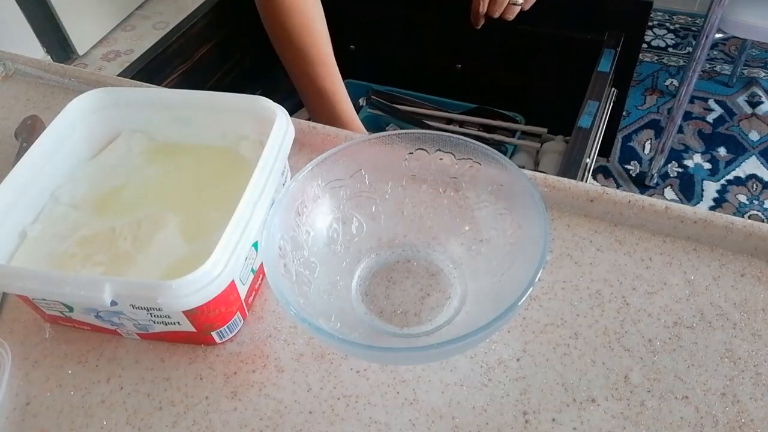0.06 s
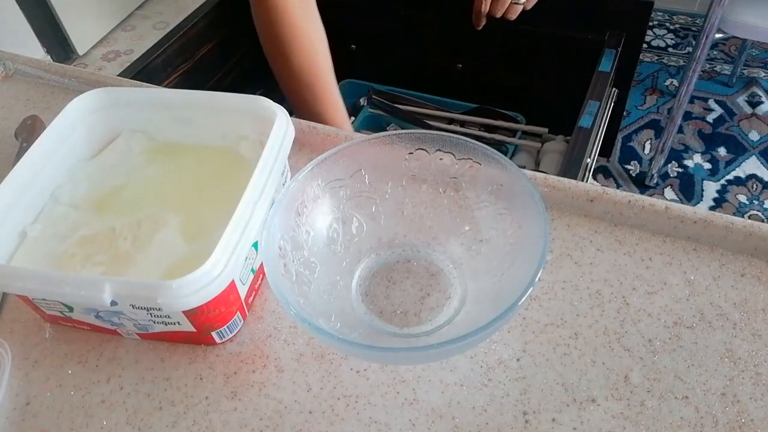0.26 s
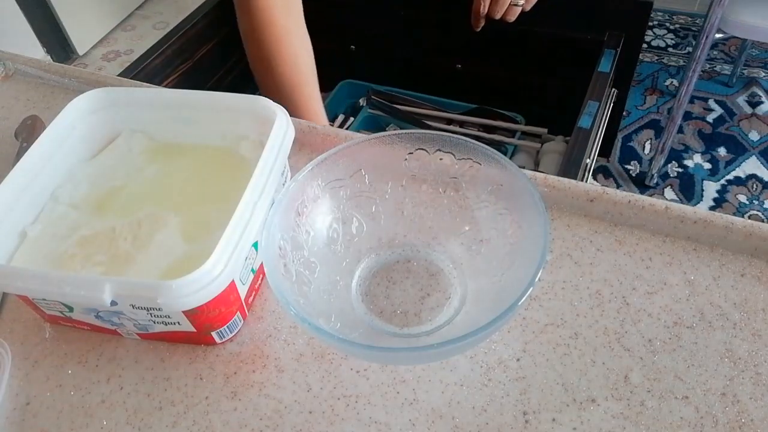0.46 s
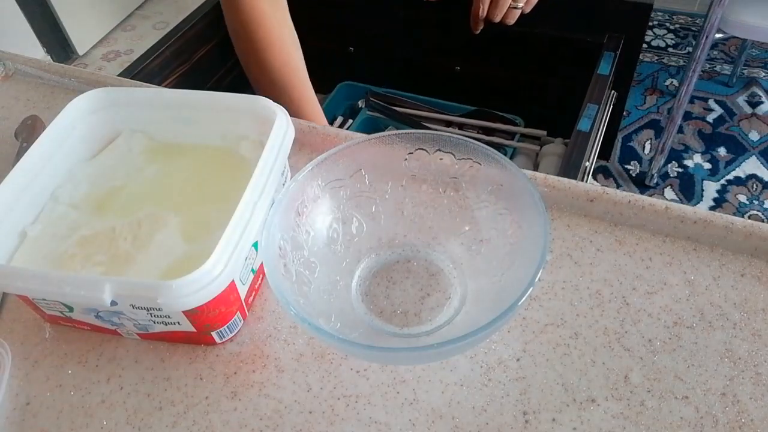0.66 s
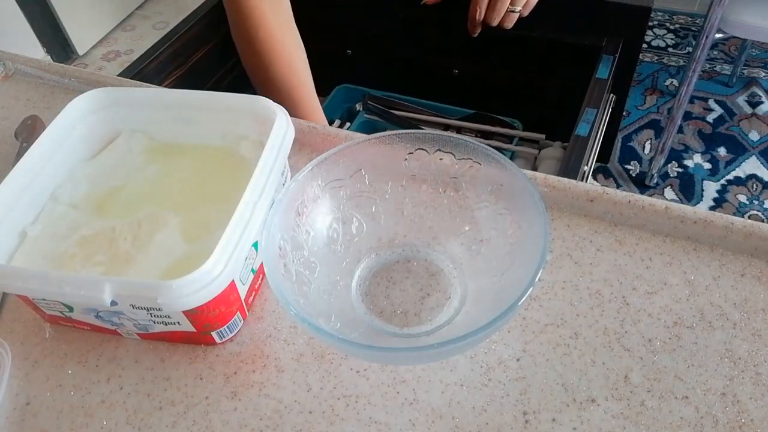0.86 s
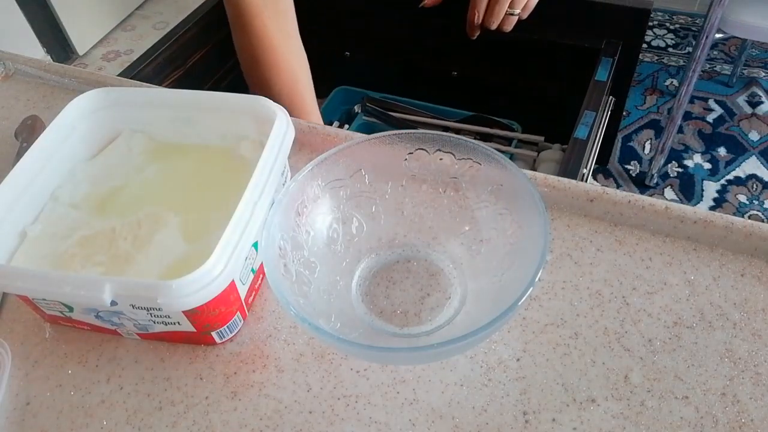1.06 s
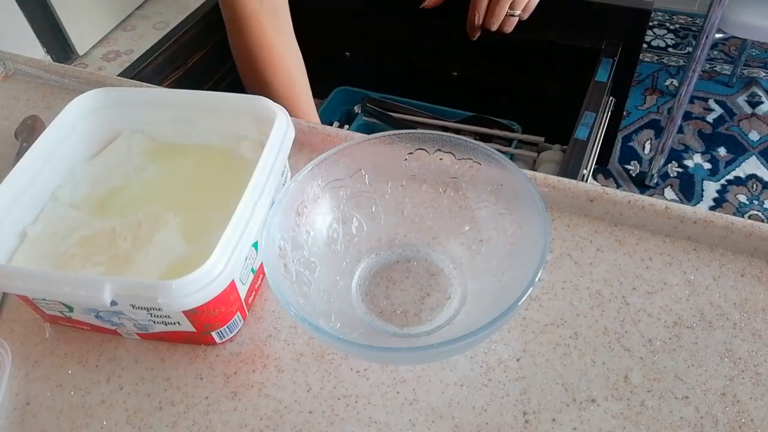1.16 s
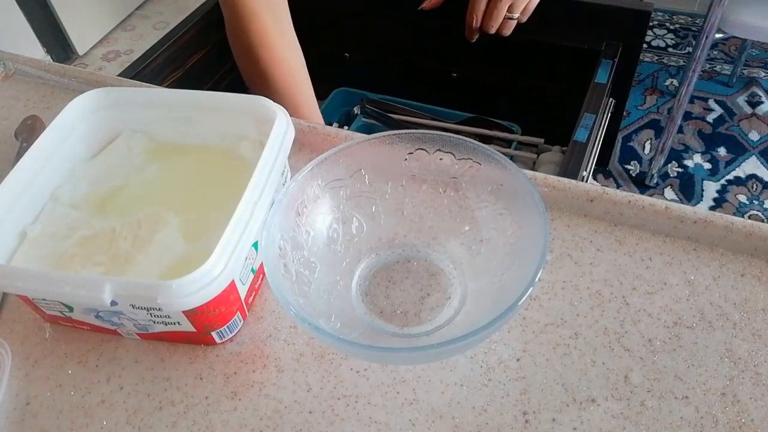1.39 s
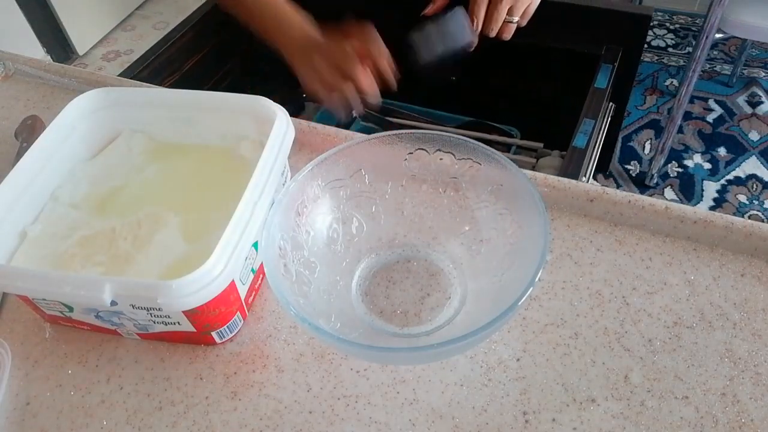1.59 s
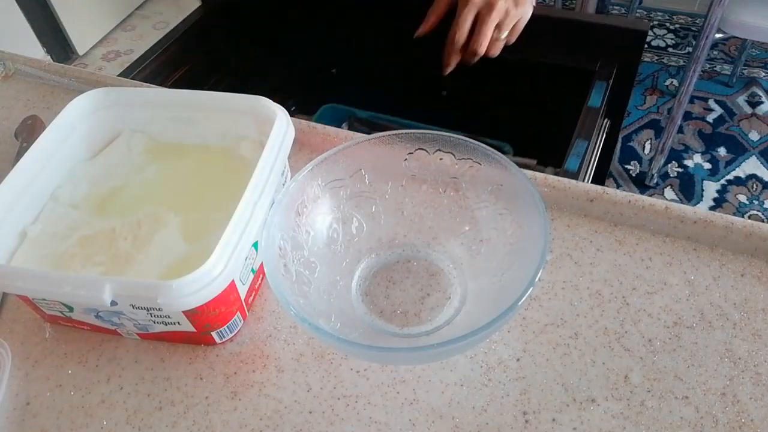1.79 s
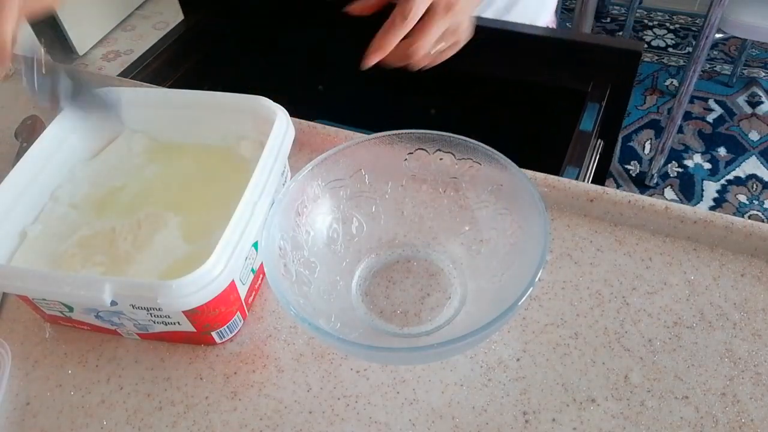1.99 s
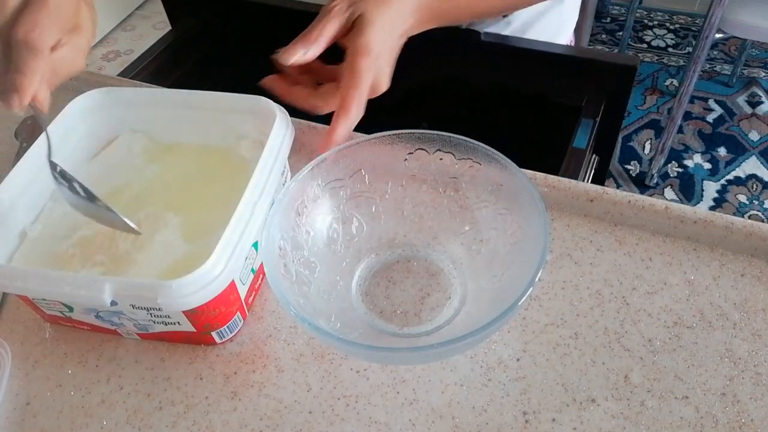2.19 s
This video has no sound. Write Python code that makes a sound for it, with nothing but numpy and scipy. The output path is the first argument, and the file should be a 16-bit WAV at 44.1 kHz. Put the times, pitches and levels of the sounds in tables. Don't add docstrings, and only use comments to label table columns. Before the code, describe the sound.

Steel spoons clatter and clink in a kitchen drawer, then the wooden drawer rumbles softly

```python
import sys
import numpy as np
from scipy import signal
from scipy.fft import rfft, irfft
from scipy.io import wavfile

SR = 44100
rng = np.random.default_rng(int(sys.argv[2]) if len(sys.argv) > 2 else 0)


def gain_from_decibels(decibels):
    exponent = np.asarray(decibels, float) / 20
    return 10 ** exponent


def pcm_store(signal):
    levels = np.round(np.clip(np.atleast_2d(signal), -1, 1) * 32767)
    wavfile.write(sys.argv[1], SR, levels.astype(np.int16).T)


N = 99225

# pitch_hz, level_db (per Hz)
AIR_SPECTRUM = [(18, -23), (30, -6.5), (130, -5), (1020, -13), (1290, -15.5), (2180, -13), (6720, -19),
                (9680, -16.5), (15500, -27.5)]
# pitch_hz, width_hz, level_db
APPLIANCE_WHINES = [(120, 14, -65.5), (313, 18, -66.5), (1000, 62, -67.5), (2197, 870, -57.5),
                    (6780, 300, -91), (8200, 68, -64), (9350, 260, -65.5), (10700, 250, -68),
                    (11170, 710, -65)]
AIR_DB, AIR_ALIKE_HZ = -53.5, 286

# start_s, level_db, pitch_hz
TRAY_KNOCKS = [(0.002, -42, 636), (0.225, -36.5, 1000), (0.281, -31, 1400), (0.304, -27.5, 970),
               (0.324, -26.5, 1060), (0.345, -29.5, 1740), (0.361, -33.5, 980), (0.395, -32, 620),
               (0.502, -33.5, 1430), (0.563, -31.5, 1500), (0.585, -41.5, 1000), (0.798, -32.5, 1390),
               (0.824, -27.5, 1000), (0.849, -22.5, 1340), (0.8805, -21, 930), (0.882, -16.5, 1630),
               (0.903, -21, 1700), (0.905, -20.5, 930), (0.936, -22, 870), (0.99, -26.5, 1120),
               (1.043, -23.5, 1250), (1.099, -29, 1300), (1.148, -31.5, 1280), (1.197, -32, 1340),
               (1.235, -37, 1060), (1.4295, -20.5, 1255), (1.434, -25, 1180), (1.482, -23, 1310),
               (1.527, -27, 1000), (1.608, -29.5, 1320), (1.684, -24.5, 1460), (1.704, -22, 830),
               (2.03, -50, 1600), (2.21, -40.5, 700)]
# pitch_hz, level_db
TRAY_MODES = [(600, 7.5), (760, 3), (900, 14), (1010, 14), (1200, 12.5), (1330, 13.5), (1480, 11.5),
              (1660, 15.5), (1850, 10.5), (2100, 5.5)]
TRAY_DB, TRAY_T60_S, TRAY_CHATTER_S, TRAY_REACH_OCT, TRAY_WET_DB = -13, 0.024, 0.0081, .45, -1.5

# start_s, level_db, pitch_hz
REACH_HITS = [(0.2154, -33.5, 10600), (0.2265, -17.5, 10800), (0.240, -32, 11000), (0.2494, -36, 11000),
              (0.2796, -15.5, 8250), (0.291, -23, 10500), (0.303, -20.5, 5100), (0.314, -19, 10600),
              (0.324, -16, 8800), (0.333, -16.5, 8100), (0.345, -17, 10900), (0.356, -36, 10500),
              (0.372, -38, 9000), (0.4774, -31, 10100), (0.503, -32.5, 8600), (0.530, -33, 8200),
              (0.540, -26.5, 8250), (0.549, -30, 10600), (0.561, -23.5, 6230), (0.5735, -36, 11700),
              (0.582, -22.5, 10800), (0.598, -47, 11000), (0.615, -50, 9000)]
GRAB_HITS = [(0.7940, -12, 11600), (0.8028, -18.5, 9900), (0.8235, -8, 10500), (0.832, -12, 11000),
             (0.8457, -8, 11000), (0.858, -11.5, 10200), (0.8700, -10, 11300), (0.885, -9.5, 9200),
             (0.8964, -15.5, 9600), (0.910, -8.5, 10000), (0.9255, -9, 11100), (0.9315, -6.5, 9800),
             (0.9440, -5, 11000), (0.957, -15, 10800), (0.971, -12, 10800), (0.987, -14.5, 10900),
             (1.017, -10.5, 10300), (1.0350, -2.5, 11100), (1.044, -9, 11900), (1.060, -11, 11100),
             (1.0744, -13.5, 12600), (1.088, -30.5, 11500), (1.104, -13, 11500), (1.125, -12, 11800),
             (1.186, -20, 11500)]
SORT_HITS = [(1.2010, -13, 9900), (1.224, -17, 10400), (1.2325, -15.5, 9800), (1.2470, -5.5, 11700),
             (1.262, -15, 10000), (1.2706, -21, 10100), (1.281, -18, 10000), (1.302, -14.5, 8700),
             (1.355, -21, 11500), (1.3625, -15.5, 12100), (1.383, -15, 11300), (1.3935, -14.5, 11200),
             (1.4175, -12, 12500)]
LIFT_HITS = [(1.4307, -7.5, 12100), (1.4415, -4, 10700), (1.456, -16, 10500), (1.470, -7.5, 11000),
             (1.4848, -5.5, 12700), (1.497, -8, 12000), (1.5106, -9.5, 9700), (1.520, -9, 11500),
             (1.530, -19, 12700), (1.545, -14, 10900), (1.5764, -10.5, 12700), (1.595, -16.5, 12700),
             (1.620, -22, 12800), (1.650, -27, 10300), (1.7065, -18, 10700), (1.7294, -21.5, 10700),
             (1.742, -37, 10700)]
# pitch_hz, level_db
REACH_MODES = [(4737, -61), (5383, -64), (6239, -59), (8086, -57), (8457, -56), (9340, -59), (10169, -59),
               (10820, -57), (11122, -60)]
GRAB_MODES = [(3655, -56), (3763, -56), (4474, -53), (4904, -54), (6266, -53), (7709, -49), (8963, -48),
              (9254, -51), (9997, -49), (10734, -45), (12376, -49), (12748, -52), (15089, -57),
              (15466, -67)]
SORT_MODES = [(4409, -58), (7720, -59), (9588, -54), (10137, -50), (11488, -52), (11682, -58), (12586, -51),
              (13534, -58), (14131, -60)]
LIFT_MODES = [(3984, -57), (5163, -58), (6605, -56), (8619, -53), (8969, -52), (9394, -50), (10557, -50),
              (10600, -49), (11440, -52), (11746, -50), (12543, -51), (13534, -53), (14982, -61),
              (15477, -60)]
RINGS_DB, RING_T60_S = -27, .08
STEEL_CHATTER_S, STEEL_REACH_OCT, STEEL_LOW_HZ = 0.0065, 1, 2360

# pitch_hz, level_db (of each mode)
HEAP_SPECTRUM = [(1410, -39), (2400, -10), (4050, -4.5), (5980, -13.5), (6470, -11.5), (6990, -14),
                 (10400, -9), (12900, -8.5), (15500, -16.5)]
HEAP_DB, HEAP_T60_S, MODE_SPREAD_DB, HEAP_TOUCHES_PER_S = -28.5, .05, 3.0, 1000

# start_s, level_db, pitch_hz
BOWL_CLINKS = [
    (1.4320, -18.5, 4200),
    (1.4480, -22, 4930),
    (1.4590, -22.5, 4080),
    (1.689, -29.5, 2930),
    (1.708, -34.5, 2960),
]
# pitch_hz, level_db
BOWL_MODES = [(2850, -3), (3150, -3), (3985, 0), (4194, 0), (4900, -3)]
BOWL_DB, BOWL_T60_S, BOWL_REACH_OCT = -6, 0.048, 0.18

# start_s, level_db, pitch_hz
DRAWER_JOLTS = [(0.222, -44, 201), (0.29, -29, 186), (0.345, -35, 94), (0.361, -41, 180),
                (0.429, -39.5, 207), (0.565, -38, 193), (0.6, -43.5, 105), (0.68, -58, 101),
                (0.844, -27, 167), (0.927, -20, 163), (0.93, -40, 85), (0.967, -29, 165),
                (1.047, -38.5, 210), (1.06, -33, 91), (1.181, -33, 170), (1.427, -30, 146), (1.46, -40, 60),
                (1.499, -30, 146), (1.55, -41, 152), (1.617, -35.5, 230), (1.689, -26.5, 122),
                (1.729, -35, 184), (1.781, -32, 124), (1.819, -52, 175), (1.851, -31, 120),
                (1.899, -34, 131), (1.949, -86, 115), (1.999, -35.5, 111), (2.043, -41, 111),
                (2.15, -44.5, 116), (2.218, -44, 115)]
# pitch_hz, level_db
BOX_MODES = [(62, -13), (78, -17), (92, -7), (106, -2), (122, 0.5), (142, -8), (165, 0), (188, -1.5),
             (225, -2.5), (265, -2.5), (312, -3)]
BOX_DB, BOX_T60_S, BOX_CHATTER_S, BOX_REACH_OCT, BOX_WET_DB = -22.5, .14, 0.037, .33, -3
BOX_ALIKE_HZ = 260

ONSET_S, TOUCH_SPREAD_DB = .0018, 3.0
ROOM_T60_S, ROOM_SWELL_S, ROOM_DB, WALL_CUT_HZ = 0.38, 0.0053, -4, 10000

# pitch_hz, level_db
PORT_BALANCE = [(300, 0), (3000, .5), (5500, 2), (9000, 9), (15000, 8)]
DUCK_FROM_DB, DUCK_SHARE, DUCK_S = -38, .3, .3
TOP_HZ = 16100


def rms_one(x):
    return x / np.sqrt(np.mean(x ** 2) + 1e-20)


def at_hz(points, hz):
    table_hz, table_db = np.array(points)[:, 0], np.array(points)[:, 1]
    return np.interp(np.log(hz), np.log(table_hz), table_db)


def colour(x, db_at):
    hz = np.maximum(np.fft.rfftfreq(N, 1 / SR), 10)
    return irfft(rfft(x) * gain_from_decibels(db_at(hz)), N)


def sieve(x, order, hz, kind):
    return signal.sosfilt(signal.butter(order, hz, kind, fs=SR, output="sos"), x)


def ring(x, hz, t60):
    r = gain_from_decibels(-60 / (t60 * SR))
    w = 2 * np.pi * hz / SR
    return signal.lfilter([0, np.sin(w)], [1, -2 * r * np.cos(w), r * r], x + 1e-18)


def touches(shape, rate):
    met = rng.random(shape) < rate / SR
    count = met.sum()
    click_db = TOUCH_SPREAD_DB * np.minimum(rng.exponential(1, count), 3)
    out = np.zeros(shape)
    out[met] = gain_from_decibels(click_db) * rng.choice([-1, 1], count)
    return out


def forces(events, dies):
    start, db, _ = np.transpose(events)[:, :, None]
    age = np.maximum(np.arange(N) / SR - start, 0)
    return gain_from_decibels(db) * (1 - np.exp(-age / ONSET_S)) * np.exp(-age / dies)


def drives(events, hz, dies, reach_oct):
    away = np.log2(hz[:, None] / np.array(events)[:, 2]) / reach_oct
    return gain_from_decibels(-np.minimum(6 * away ** 2, 12)) @ forces(events, dies)


def strike(events, modes, t60, dies, reach_oct, rate, channels):
    hz, db = np.transpose(modes)
    drive = gain_from_decibels(db - db.max())[:, None] * drives(events, hz, dies, reach_oct)
    return sum(ring(force * touches((channels, N), rate), f, t60) for force, f in zip(drive, hz))


def kitchen(x, wet_db):
    age = np.arange(SR // 2) / SR
    tail = rng.standard_normal((2, SR // 2)) * gain_from_decibels(-60 * age / ROOM_T60_S)
    tail = sieve(tail * (1 - np.exp(-age / ROOM_SWELL_S)), 1, WALL_CUT_HZ, "low")
    tail /= np.sqrt((tail ** 2).sum(axis=1, keepdims=True))
    return x + gain_from_decibels(wet_db) * signal.fftconvolve(x, tail, axes=1)[:, :N]


def still_room():
    mid, side = rng.standard_normal((2, N))
    side = sieve(side, 2, AIR_ALIKE_HZ, "high")
    air = colour(np.array([mid + side, mid - side]), lambda hz: at_hz(AIR_SPECTRUM, hz))
    out = gain_from_decibels(AIR_DB) * rms_one(air)
    for hz, width, db in APPLIANCE_WHINES:
        noise = rng.standard_normal((1 if hz < AIR_ALIKE_HZ else 2, N))
        t60 = 4.2 / width
        out += gain_from_decibels(db) * rms_one(ring(ring(noise, hz, t60), hz, t60))
    return out


def tray():
    out = strike(TRAY_KNOCKS, TRAY_MODES, TRAY_T60_S, TRAY_CHATTER_S, TRAY_REACH_OCT,
                 rate=2000, channels=1)
    return sieve(gain_from_decibels(TRAY_DB) * out, 2, [420, 2600], "band")


def heap(events):
    out = 0
    centres = np.geomspace(2900, 13800, 8)
    age = np.arange(2400) / SR
    for centre, force in zip(centres, drives(events, centres, STEEL_CHATTER_S, STEEL_REACH_OCT)):
        count = int(40 + centre / 90)
        hz = np.minimum(centre * 2 ** rng.uniform(-.3, .3, (count, 1)), 15900)
        t60 = HEAP_T60_S * rng.uniform(.4, 1.5, hz.shape)
        phase = rng.uniform(0, 2 * np.pi, (2, count, 1))
        gain = gain_from_decibels(at_hz(HEAP_SPECTRUM, hz) + MODE_SPREAD_DB * rng.standard_normal((2, count, 1)))
        modes = gain * gain_from_decibels(-60 * age / t60) * np.sin(2 * np.pi * hz * age + phase)
        body = modes.sum(axis=1)
        clicks = force * touches(N, HEAP_TOUCHES_PER_S)
        out = out + signal.fftconvolve(clicks[None], body, axes=1)[:, :N]
    return out


def spoon_bowls():
    return gain_from_decibels(BOWL_DB) * strike(BOWL_CLINKS, BOWL_MODES, BOWL_T60_S, STEEL_CHATTER_S, BOWL_REACH_OCT,
                                 rate=900, channels=2)


def cutlery():
    moves = [(REACH_HITS, REACH_MODES), (GRAB_HITS, GRAB_MODES),
             (SORT_HITS, SORT_MODES), (LIFT_HITS, LIFT_MODES)]
    out = 0
    for hits, modes in moves:
        clear = strike(hits, modes, RING_T60_S, STEEL_CHATTER_S, STEEL_REACH_OCT, rate=1000, channels=2)
        out = out + gain_from_decibels(RINGS_DB) * clear + gain_from_decibels(HEAP_DB) * heap(hits)
    return sieve(out + spoon_bowls(), 3, STEEL_LOW_HZ, "high")


def drawer():
    out = strike(DRAWER_JOLTS, BOX_MODES, BOX_T60_S, BOX_CHATTER_S, BOX_REACH_OCT, rate=2000, channels=1)
    out = sieve(gain_from_decibels(BOX_DB) * out, 2, [65, 420], "band")
    upper = sieve(out, 3, BOX_ALIKE_HZ, "high")
    echo = kitchen(np.vstack([upper, upper]), BOX_WET_DB) - upper
    return out + echo


def scene():
    return still_room() + kitchen(tray(), TRAY_WET_DB) + kitchen(cutlery(), ROOM_DB) + drawer()


def low_pass(x):
    return signal.sosfilt(signal.butter(12, 16470, fs=SR, output="sos"), x)


def record(dry):
    left = colour(dry[0], lambda hz: at_hz(PORT_BALANCE, hz) / 2)
    right = colour(dry[1], lambda hz: -at_hz(PORT_BALANCE, hz) / 2)
    r = np.exp(-1 / (DUCK_S * SR))
    level_db = 10 * np.log10(signal.lfilter([1 - r], [1, -r], left ** 2) + 1e-9)
    duck_db = -DUCK_SHARE * np.maximum(level_db - DUCK_FROM_DB, 0)
    ducked = np.array([left, right]) * gain_from_decibels(duck_db)
    mix = signal.sosfilt(signal.cheby2(12, 60, TOP_HZ, fs=SR, output="sos"), ducked)
    return low_pass(mix)


dry = scene()
out = record(dry)
pcm_store(out)
```